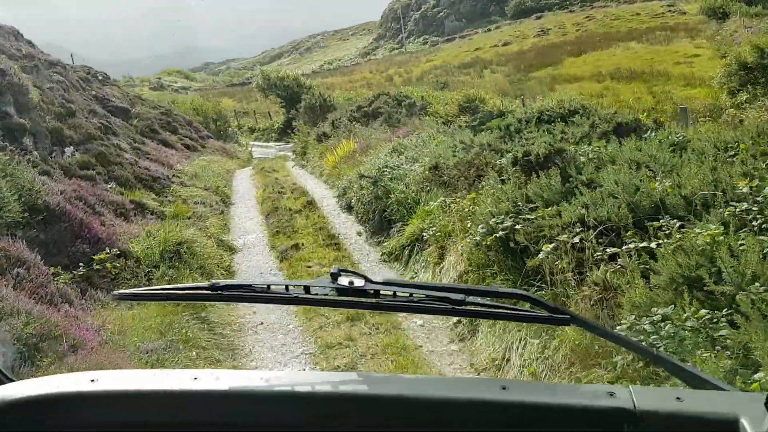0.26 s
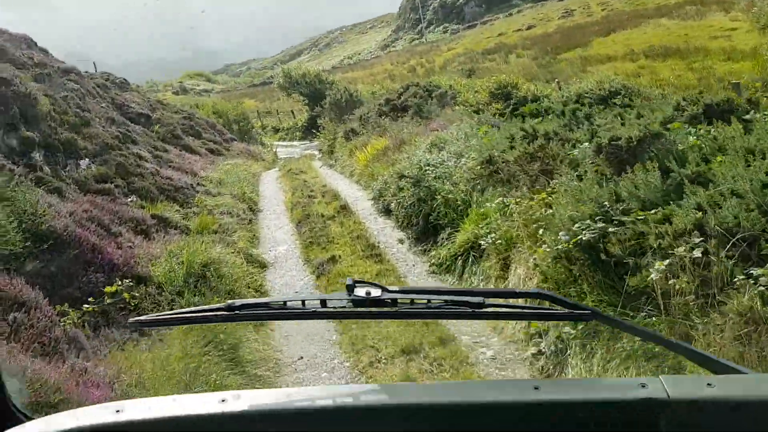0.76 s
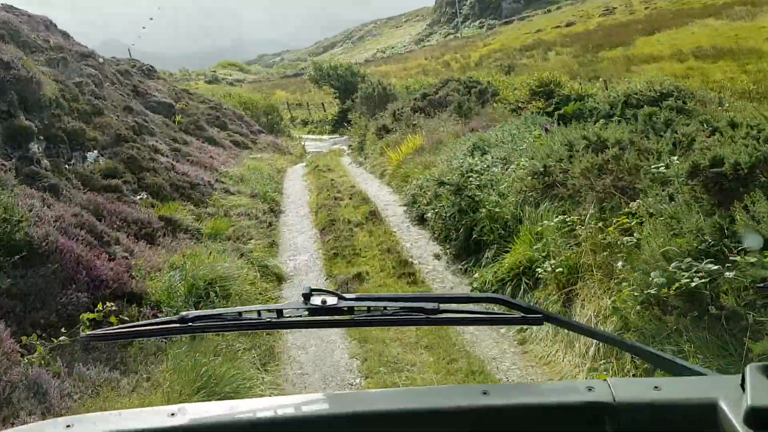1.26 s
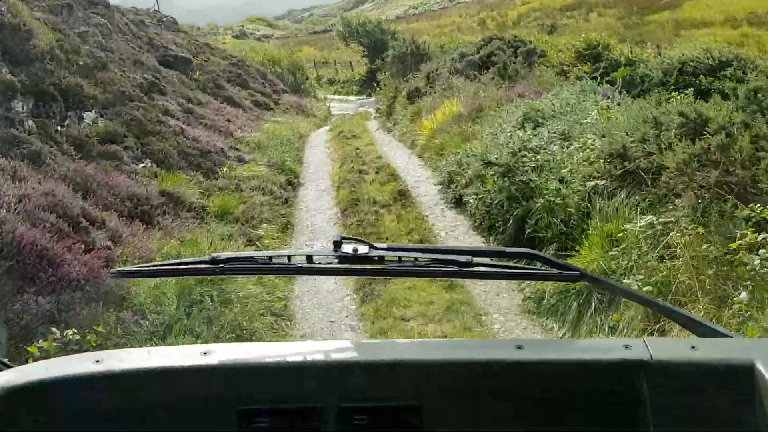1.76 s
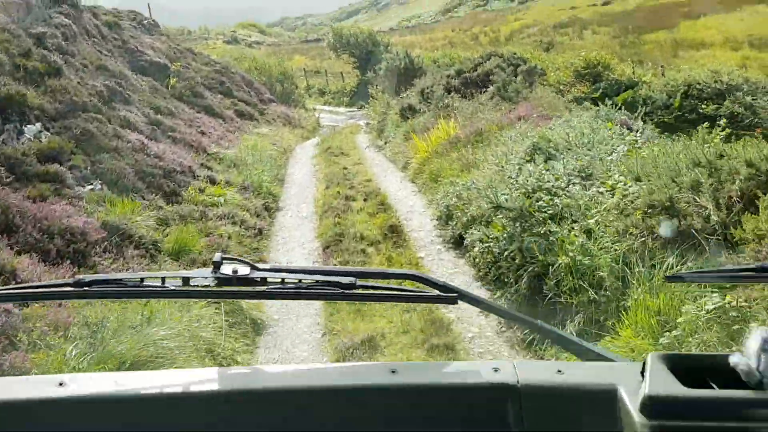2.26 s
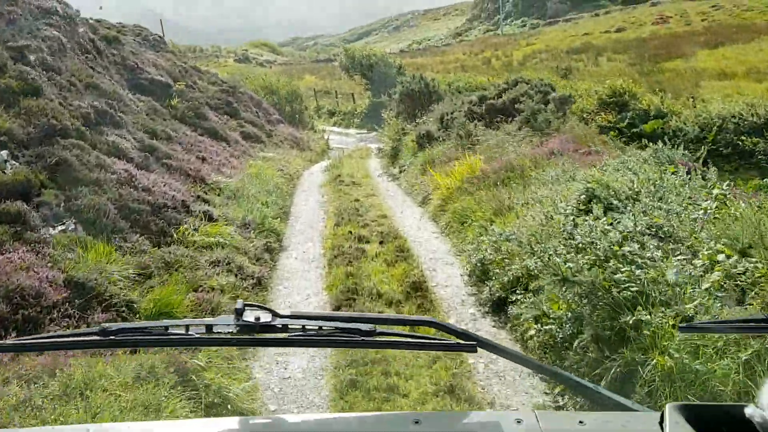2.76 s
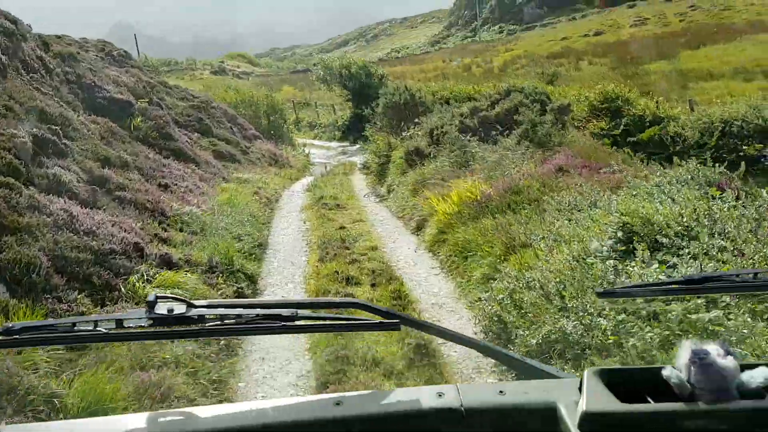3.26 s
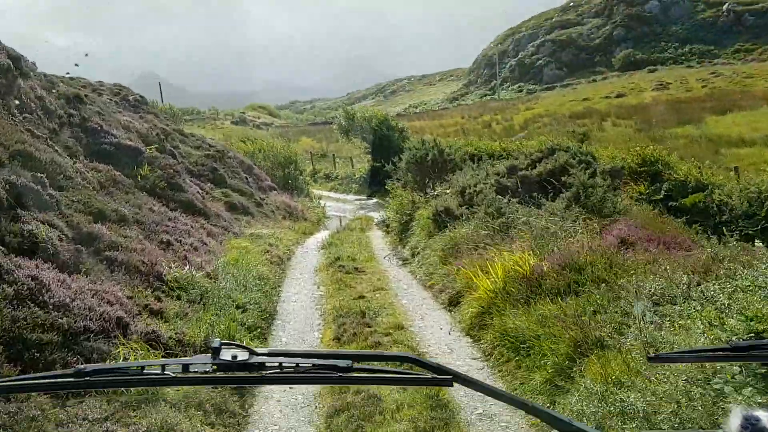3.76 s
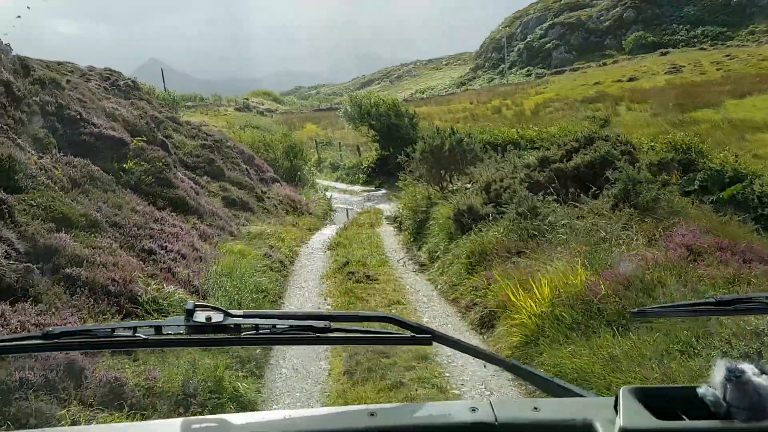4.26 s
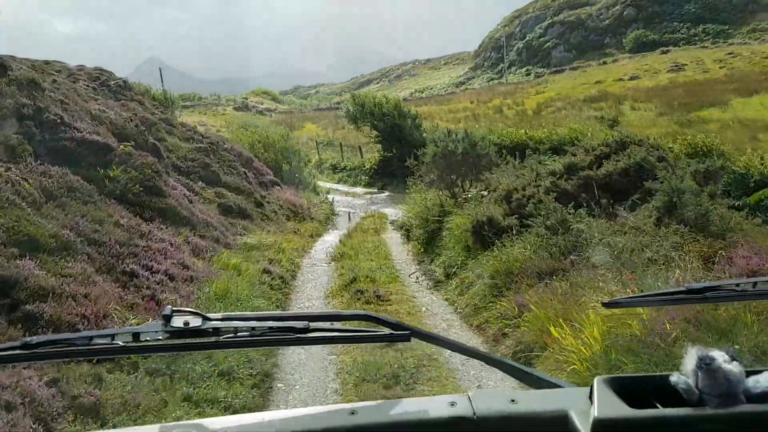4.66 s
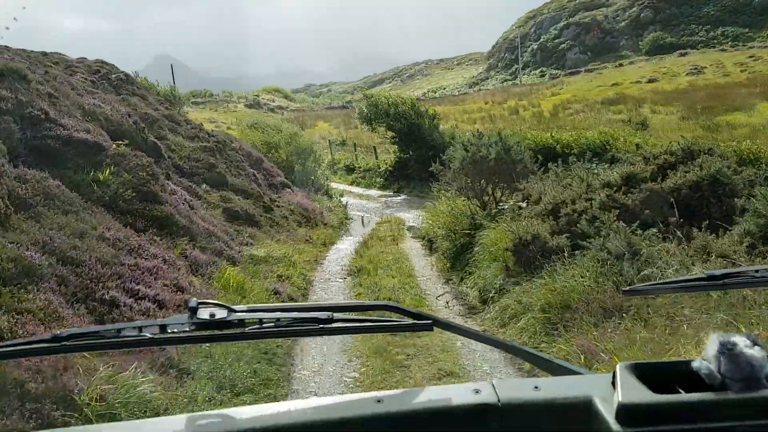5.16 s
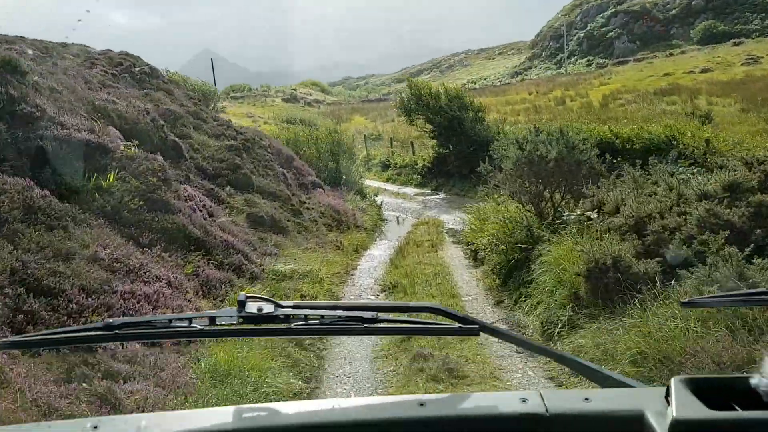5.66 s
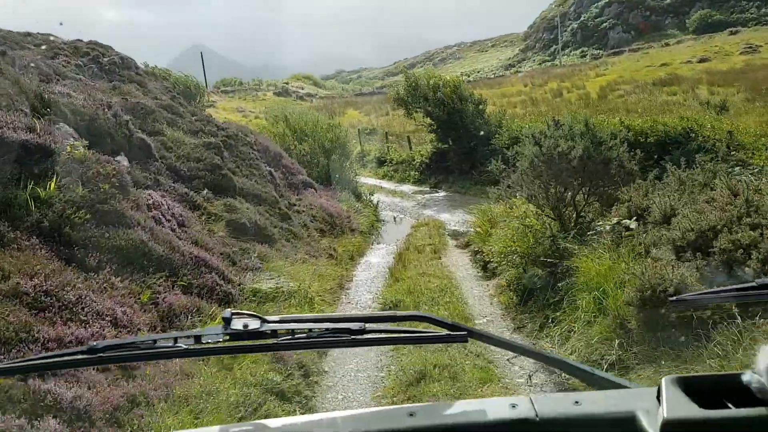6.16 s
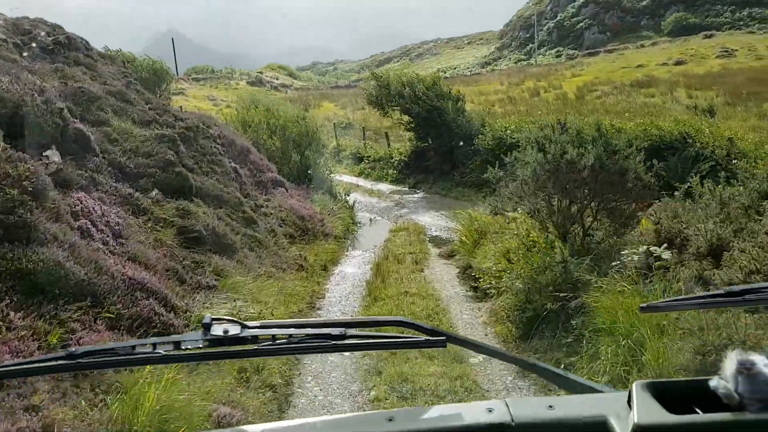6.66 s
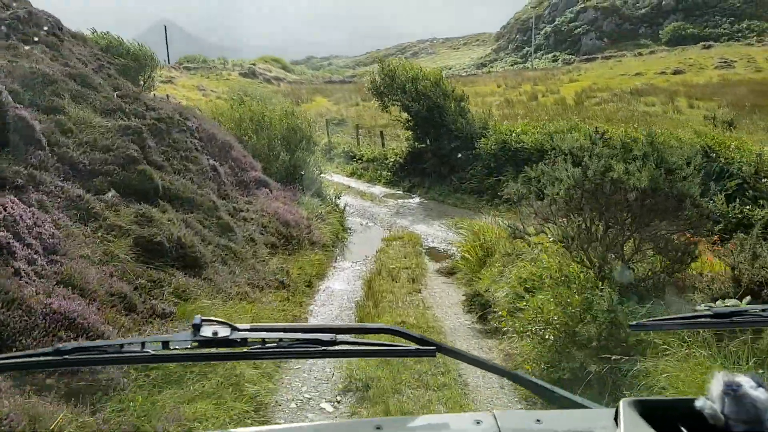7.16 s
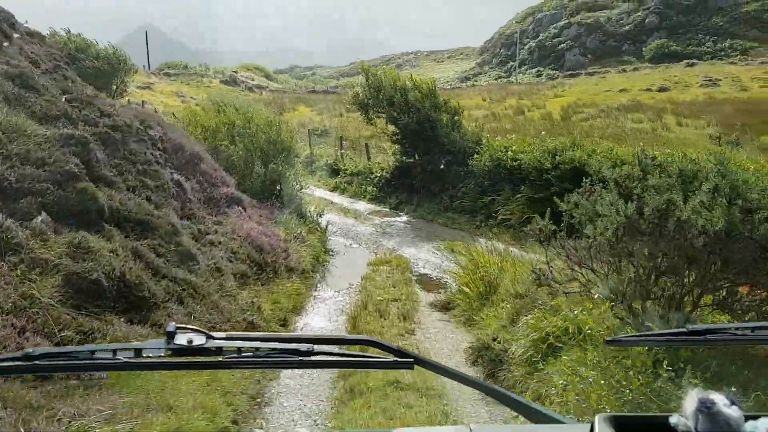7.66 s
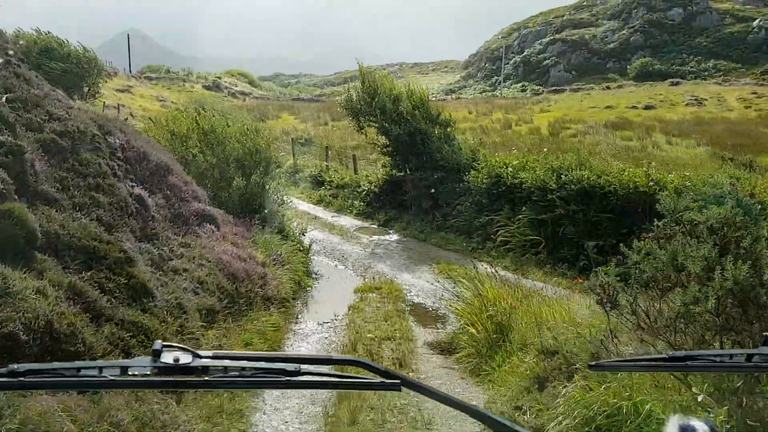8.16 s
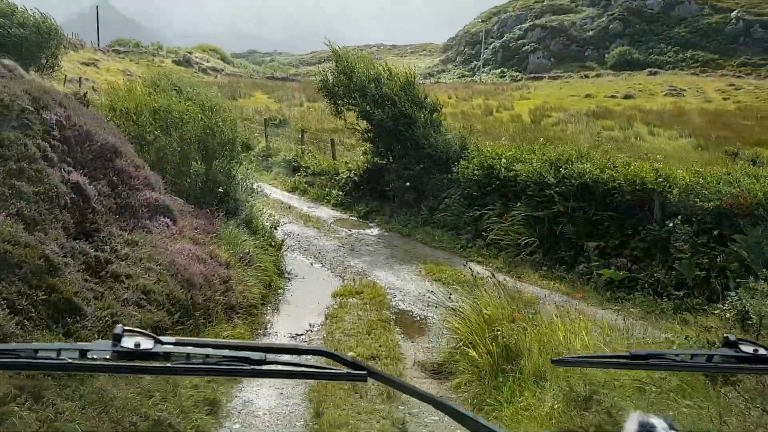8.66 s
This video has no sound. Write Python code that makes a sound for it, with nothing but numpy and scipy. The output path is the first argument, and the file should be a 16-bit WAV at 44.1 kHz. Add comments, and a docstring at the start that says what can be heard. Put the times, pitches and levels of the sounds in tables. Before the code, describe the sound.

A low diesel boom swells and sinks continually in the closed cab of a slow truck, its clatter steady over floor rumble. Two early suspension thumps and a cluster of dry plastic snaps give way to sparser rattles and short squeaks. Faint treble swishes, as if brush drags on the body, fade out after five seconds. One more knock with a sharp snap follows, then mostly engine until it eases off. Near, dry, handheld stereo perspective.

```python
"""A six-cylinder diesel booms inside the cab of a truck crawling along a bumpy track: its firing orders are tones.
Combustion rings the block and gates noise for the clatter; one loose valve ticks once per engine cycle.
The suspension knocks on ringing frame modes, trim snaps in noise bursts, and small parts squeak as short tones.
Treble swishes, hiss and road rumble are shaped noise, and a faint high whine is a blurred tone.
Two microphone ports a hand apart hear it all."""
import sys
import numpy as np
from scipy import signal
from scipy.fft import rfft, irfft, next_fast_len
from scipy.io import wavfile
from scipy.ndimage import uniform_filter1d, map_coordinates

SR = 44100
rng = np.random.default_rng(int(sys.argv[2]) if len(sys.argv) > 2 else 0)


def transcribe(u):
    """Save the signal u as a 16-bit wav file named by the first command-line argument.

    u: samples, shape (n,) or (channels, n), limited to [-1, 1]; the rate is SR.
    q: integer samples, one column per channel.
    """
    v = np.clip(np.atleast_2d(u).T, -1, 1)
    q = np.round(v * 32767).astype(np.int16)
    wavfile.write(sys.argv[1], SR, q)


N = 392043

# Engine speed. Each row: time in seconds, firings per second.
FIRING_RATE = [(0.0, 44.6), (0.15, 41.8), (0.3, 37.8), (0.8, 39.3), (1.1, 48.9), (1.4, 41.6), (1.68, 47.8),
               (1.9, 46.6), (2.5, 49.7), (2.8, 47.6), (3.3, 49.5), (3.65, 47.2), (3.95, 50.2), (4.5, 49.1),
               (4.9, 46.7), (5.2, 48.4), (6.2, 48.4), (6.8, 49.5), (7.8, 52.1), (8.1, 48.4), (8.4, 47.2),
               (8.89, 46.6)]
# The firing note swells as the engine pulls and sinks as it eases. Each row: time in seconds, mean level in dB.
FIRST_ORDER = [(0.0, -67), (0.05, -17.5), (0.17, -18.5), (0.27, -28), (0.91, -17.5), (1.09, -21),
               (1.21, -40), (1.29, -21), (1.68, -21), (1.81, -30.5), (2.01, -17.5), (2.23, -20),
               (2.35, -31.5), (2.43, -20.5), (3.27, -31.5), (3.34, -18), (3.69, -29.5), (3.74, -20.5),
               (3.89, -28), (3.99, -19.5), (4.9, -22.5), (5.07, -15.5), (5.22, -33), (5.35, -22.5),
               (6.41, -26.5), (6.78, -19), (7.6, -22), (8.12, -30), (8.17, -43.5), (8.86, -28), (8.89, -37)]
# The tone at twice the firing rate. Each row: time in seconds, mean level in dB.
SECOND_ORDER = [(0, -26), (.75, -28.5), (.95, -23), (1.12, -36.5), (1.45, -26), (2.1, -39), (2.5, -39),
                (2.9, -25.5), (3.5, -38), (4.55, -37.5), (5.1, -33.5), (6.3, -31.5), (6.9, -47),
                (7.7, -33.5), (8.89, -41)]
# Weaker, higher orders. Each row: multiple of the firing rate, mean level in dB.
UPPER_ORDERS = [(1.5, -48), (4, -56.5), (5, -46.5), (7, -46.5), (8, -51)]
# How hard road and engine work. Each row: time in seconds, rumble in dB, clatter in dB, both before a fixed trim.
LOAD = [(0, -31, -43.5), (.7, -25.5, -38), (1.7, -28.5, -40), (3.6, -29, -39.5), (5.8, -30, -39),
        (6.6, -29.5, -39), (7.9, -31, -39.5), (8.3, -33, -41), (8.89, -28, -43.5)]
# Mean strength of each cylinder in firing order, in dB.
CYLINDER_DB = [-0.5, -5.5, -2.5, -1, -10, -2]
# Tone of the clatter noise before the cab colours it. Each row: frequency in Hz, relative level in dB per Hz.
BLOCK_COLOUR = [(180, -39), (300, -8), (349, -2), (534, -13.5), (598, -7.5), (797, -15.5), (882, -8),
                (1350, -10.5), (1920, -20.5), (2760, -21.5), (6000, -48), (7800, -87), (13200, -120)]
# Block modes rung by combustion. Each row: frequency in Hz, relative level in dB, 60 dB decay time in seconds.
BLOCK_MODES = [(733, 5.5, 0.06), (894, -1.5, 0.077), (1299, 7.5, 0.082), (1510, 0, 0.13), (1723, -3.5, 0.1),
               (2174, -2, 0.066), (2530, -3, 0.1), (2783, 1, 0.063), (2920, -9.5, 0.069),
               (3270, -1.5, 0.02), (4020, -13.5, 0.044)]
# Modes of the valve tick. Each row: frequency in Hz, relative level in dB, 60 dB decay time in seconds.
VALVE_MODES = [(2150, -5, .04), (3620, 1, .022), (4600, -9, .02)]
# Suspension knocks. Each row: start in seconds, shudder level before colouring in dB, gain of the ring in dB,
# delay of the rebound in seconds, rebound level in dB.
KNOCKS = [(.028, -11.5, -19, .028, -17.5), (.866, -19.5, -24.5, 0.0279, -15),
          (5.546, -20.5, -24.5, 0.0333, -16)]
# Modes of the truck frame. Each row: frequency in Hz, relative level in dB, 60 dB decay time in seconds.
FRAME_MODES = [(76.4, -7, 0.29), (141, 2.5, 0.35), (275, 11.5, 0.065), (335, -8, 0.37), (450, -1, 0.073),
               (592, -2, 0.18), (691, -1, 0.14), (1247, -16, 0.064)]
# Trim snaps. Each row: start in seconds, burst level before band shaping in dB, dullness (lift of the low part) in dB.
SNAPS = [(0.1308, -41.5, 4), (0.1757, -47, -2), (0.2065, -46, 1), (0.363, -46, -11), (0.4864, -43, 0),
         (0.5194, -41, 2), (0.6429, -32.5, 16.5), (0.97, -34, 3), (1.003, -39.5, 3), (1.209, -37.5, -15),
         (1.6053, -44, 20.5), (2.1929, -38, 11), (2.5705, -50, 17), (3.0999, -45, 0), (3.354, -39.5, 5),
         (3.437, -41, 13), (3.471, -39.5, 0), (3.7766, -38.5, 4), (4.016, -43.5, 0.5), (5.1038, -45, 17.5),
         (5.5843, -31, -1.5), (6.55, -46, 0), (8.509, -42.5, 8)]
# Squeaks and pings. Each row: start in seconds, pitch in Hz, mean peak level in dB, length in seconds.
SQUEAKS = [(1.815, 735, -34, .045), (2.828, 1070, -33, .025), (3.842, 9350, -62, .04),
           (5.34, 730, -41, .07), (5.92, 720, -39, .06), (.65, 2030, -37, .04)]
# A faint whine: frequency in Hz, level in dB.
WHINE = (14550, -87)
# Treble swishes. Each row: start in seconds, length in seconds, level at the middle in dB.
SWISHES = [(0.197, 0.28, -64), (0.454, 0.12, -56), (0.59, 0.31, -53), (0.918, 0.18, -53.5),
           (1.146, 0.16, -60), (1.312, 0.1, -57), (1.82, 0.1, -64), (2.19, 0.23, -68), (2.46, 0.23, -61),
           (3.303, 0.36, -63), (4.61, 0.19, -62), (4.847, .15, -60.5), (5.086, 0.24, -65)]
# Tone of the swishes. Each row: frequency in Hz, relative level in dB per Hz.
SWISH_COLOUR = [(2500, -30), (4500, -5), (8300, -2), (9800, -4), (12500, -1), (16000, -2)]
# Tone of the hiss. Each row: frequency in Hz, relative level in dB per Hz.
HISS_COLOUR = [(2000, -19), (4500, -1), (6500, 0), (8100, 2), (9300, -8), (12000, -5), (16000, -6)]
# Tone of the rumble before the cab colours it. Each row: frequency in Hz, relative level in dB per Hz.
ROAD_COLOUR = [(15, -28), (30, -1.5), (45, 3), (64, -4), (98, -3.5), (159, -5.5), (208, -14), (300, -13.5),
               (352, -12), (524, -23.5), (800, -27), (1200, -52), (2000, -120)]
# Cab resonances. Each row: centre in Hz, width in Hz, lift in dB.
PANELS = [(318, 29, -3.5), (610, 37, 2.5), (739, 29, 6), (840, 53, 1.5), (2740, 40, 5.5), (3260, 37, 7.5)]
# How alike diffuse noise is at the two ports. Each row: frequency in Hz, likeness from 0 to 1.
LIKENESS = [(60, 0.99), (130, 0.69), (250, 0.88), (500, 0.99), (1400, 0.078), (4000, 0.05), (15000, 0.033)]
# Colour difference of the ports. Each row: frequency in Hz, left minus right in dB.
BALANCE = [(60, 3.5), (110, 2.5), (200, -1), (380, -0.5), (700, -3.0), (1290, -3.5), (2380, -3.5),
           (4400, -1.5), (8120, -3), (15000, 2.5)]

CYLINDERS = 6
IGNITION = .55  # part of a firing interval after which the charge lights
# Mean level or gain in dB, and dB followed per dB of the second order
THIRD_DB, THIRD_FOLLOWS = -38.5, 0.11
KNOCK_DB, KNOCK_FOLLOWS = -45.5, 0.25
# Valve tick: mean gain in dB, dB gained per dB that the pull eases, seconds over which the pull is averaged
TICK_DB, TICK_SLACK, SLACK_S = -48.5, 0.59, 0.57
REBOUND_HZ, REBOUND_S = 142.4, 0.036  # pitch and length of the soft rebound
EDGE_DB, EDGE_LOSS = -12, .6  # high part of a snap in dB, and dB it loses per dB of dullness
LAG_S = 0.00029  # the left port hears this much later
TOP_HZ = 15750  # band limit


def amp(db):
    """Gain of a level in dB."""
    return 10 ** (np.asarray(db) / 20)


def unit(x):
    """Scale to rms 1."""
    return x / np.sqrt(np.mean(x ** 2) + 1e-20)


def along(points, hz):
    """Read a table of (Hz, value) along a log frequency axis."""
    f, v = np.transpose(points)
    return np.interp(np.log(hz + 1), np.log(f + 1), v)


def curves(rows):
    """One value per sample for each column after the time."""
    s, *cols = np.transpose(rows)
    return [np.interp(np.arange(N) / SR, s, c) for c in cols]


def wobble(rate):
    """A smooth random curve with `rate` knots a second."""
    knots = rng.standard_normal(int(N * rate / SR) + 4)
    return map_coordinates(knots, [np.arange(N) * rate / SR])


def filtered(x, response):
    """Apply a complex frequency response, with both ends mirrored so that they stay smooth."""
    edge = SR // 4
    x = np.pad(x, [(0, 0)] * (x.ndim - 1) + [(edge, edge)], mode="reflect")
    m = next_fast_len(x.shape[-1])
    spectrum = rfft(x, m) * response(np.fft.rfftfreq(m, 1 / SR))
    return irfft(spectrum, m)[..., edge:edge + N]


def diffuse(pair, colour_db):
    """Colour two unrelated signals and mix them into a left and right as alike as the cab allows."""
    def response(hz):
        turn = np.arccos(np.clip(along(LIKENESS, hz), -1, 1)) / 2
        return amp(colour_db(hz)) * [np.cos(turn), np.sin(turn)]

    mid, side = filtered(pair, response)
    return np.array([mid + side, mid - side])


def panels_db(hz):
    """Lift in dB that the cab resonances give."""
    return sum(db / (1 + (2 * (hz - c) / w) ** 2) for c, w, db in PANELS)


def ring(modes, t):
    """One blow on a set of modes, each at a strength of its own; the blow takes a moment to build."""
    scatter_db, rise_s = 1.2, .0008
    tone = 0
    for hz, db, t60 in modes:
        decay = amp(db + rng.normal(0, scatter_db) - 60 * t / t60)
        tone = tone + decay * np.sin(2 * np.pi * hz * t)
    return (1 - np.exp(-t / rise_s)) * tone


def patchy(pair, depth_db):
    """Noise whose bands swell and sink in patches of their own."""
    z = signal.stft(pair, nperseg=512)[2]
    field = uniform_filter1d(rng.standard_normal(z.shape[1:]), size=3, axis=0)
    field = uniform_filter1d(field, size=12, axis=1)
    return signal.istft(z * amp(depth_db * unit(field)), nperseg=512)[1][:, :N]


def boom(firings, first_db, second_db, load_db):
    """The firing orders drum in the cab as nearly clean tones, tied to the count of firings."""
    waver_db, drift_rad = 2.5, .22  # unsteadiness of level and phase
    third_db = THIRD_DB + THIRD_FOLLOWS * (second_db - second_db.mean()) + 3.84 * wobble(7)
    levels = [first_db + 0.71 * wobble(7), second_db + waver_db * wobble(7), third_db]
    tones = np.zeros(N)
    for k, db in enumerate(levels, 1):
        tones += amp(db) * np.cos(2 * np.pi * k * firings + drift_rad * k * wobble(6))
    for k, db in UPPER_ORDERS:
        level = amp(db + load_db + waver_db * wobble(4.6))
        tones += level * np.cos(2 * np.pi * k * firings + .5 * wobble(5))
    return np.sqrt(2) * tones


def clatter(firings, level_db, knock_db):
    """Each ignition rings the block and lets a puff of noise through, each cylinder at its own strength."""
    stroke = np.floor(firings + 1 - IGNITION).astype(int)
    scatter_db = 2.1 * rng.standard_normal(stroke[-1] + 1)[stroke]
    size = amp(np.take(CYLINDER_DB, (stroke - 1) % CYLINDERS) + scatter_db)
    puffs = size * np.exp(-3 * ((firings - IGNITION) % 1))
    gate = uniform_filter1d(0.99 + 0.54 * puffs, size=80)  # smoothed so that the puffs do not click
    noise = gate * patchy(rng.standard_normal((2, N)), depth_db=1.2)
    noise = unit(diffuse(noise, lambda hz: along(BLOCK_COLOUR, hz) + panels_db(hz)))
    blows = np.diff(stroke, prepend=stroke[0]) * size
    knock = signal.fftconvolve(blows, ring(BLOCK_MODES, np.arange(SR // 10) / SR))[:N]
    return amp(level_db + 3.5 + 0.21 * wobble(6.4)) * noise + amp(knock_db) * knock


def valve(firings, pull_db):
    """One loose valve rings once per engine cycle, with the last cylinder; louder as the engine eases."""
    t = np.arange(SR // 20) / SR
    cycle = np.floor((firings + 1 - IGNITION) / CYLINDERS)
    slack_db = pull_db.mean() - uniform_filter1d(pull_db, round(SLACK_S * SR))
    tick_db = TICK_DB + TICK_SLACK * slack_db + 1.2 * wobble(6.4)
    blows = np.diff(cycle, prepend=cycle[0]) * amp(tick_db)
    return signal.fftconvolve(blows, ring(VALVE_MODES, t))[:N]


def knocks():
    """The suspension hits rubber stops: the frame rings and shudders after a soft start, then thumps back."""
    t = np.arange(SR // 2) / SR
    tones, shudder = np.zeros((2, N + SR)), np.zeros((2, N + SR))
    soft = 1 - np.exp(-t / .002)
    thump = np.sin(np.pi * np.minimum(t / REBOUND_S, 1)) * np.sin(2 * np.pi * REBOUND_HZ * t)
    for s, db, ring_db, delay, rebound_db in KNOCKS:
        hit = slice(round(s * SR), round(s * SR) + len(t))
        back = slice(round((s + delay) * SR), round((s + delay) * SR) + len(t))
        tones[:, hit] += amp(ring_db) * soft * ring(FRAME_MODES, t)
        tones[:, back] += amp(rebound_db) * thump
        shudder[:, hit] += amp(db - 60 * t / 0.2) * soft * rng.standard_normal((2, len(t)))

    def dull(hz):  # treble falls away above 1200 Hz, bass below 120 Hz
        return 14 - 40 * np.log10(1 + (hz / 1200) ** 2) - 20 * np.log10(1 + (120 / (hz + 1)) ** 2)

    return tones[:, :N] + diffuse(shudder[:, :N], dull)


def snaps():
    """Loose plastic trim snaps: short noise bursts in a low, a middle and a high part."""
    parts, t = np.zeros((3, 2, N + SR)), np.arange(SR // 4) / SR
    envelope = amp(-60 * t / 0.086) * (1 - np.exp(-t / 0.0024))
    for s, db, dull_db in SNAPS:
        burst = amp(db) * envelope * rng.standard_normal((2, len(t)))
        part_gains = amp([dull_db, 0, EDGE_DB - EDGE_LOSS * dull_db])
        start = round(s * SR)
        parts[:, :, start:start + len(t)] += part_gains[:, None, None] * burst
    bands = [(2110, 3420, 0.78), (4820, 7200, 1.4), (13000, 6000, 4)]  # centre Hz, width Hz, gain dB
    out = np.zeros((2, N))
    for part, (c, w, db) in zip(parts, bands):
        out += diffuse(part[:, :N], lambda hz: db - 3 * (2 * (hz - c) / w) ** 4)
    return out


def squeaks():
    """Parts that rub or ping give brief tones of rough level; the whine is a tone of jittering phase."""
    whine_hz, whine_db = WHINE
    phase = 2 * np.pi * whine_hz * np.arange(N) / SR + 2.5 * wobble(60)
    out = np.sqrt(2) * amp(whine_db) * np.sin(phase)
    rough = amp(2.5 * wobble(70))
    for s, hz, db, length in SQUEAKS:
        t = np.arange(round(length * SR)) / SR
        at = slice(round(s * SR), round(s * SR) + len(t))
        swell = np.sqrt(np.sin(np.pi * t / length))
        out[at] += amp(db) * rough[at] * swell * np.sin(2 * np.pi * hz * t)
    return out


def rustle(load_db):
    """Grainy treble noise swishes, perhaps brush dragging along the body, over a hiss that follows the load."""
    t = np.arange(N) / SR
    swell = sum(amp(db) * np.exp(-(2 * (t - s) / length - 1) ** 4) for s, length, db in SWISHES)
    grains = amp(1.5 * wobble(30) + 1.2 * wobble(150))
    brush = unit(diffuse(grains * rng.standard_normal((2, N)), lambda hz: along(SWISH_COLOUR, hz)))
    hiss = unit(diffuse(rng.standard_normal((2, N)), lambda hz: along(HISS_COLOUR, hz)))
    return swell * brush + amp(-63 + 0.76 * load_db + 0.59 * wobble(16.0)) * hiss


def road(level_db):
    """Tyres and axles rumble through the floor: low noise in lumps, coloured by the cab."""
    lumps = amp(0.35 * wobble(4.3) + 1.2 * wobble(14))
    noise = diffuse(lumps * rng.standard_normal((2, N)), lambda hz: along(ROAD_COLOUR, hz) + panels_db(hz))
    return amp(level_db + 0.2) * unit(noise)


def scene():
    """All sources in the cab, with the engine sounds driven by one count of firings."""
    road_db, clatter_db = curves(LOAD)
    load_db = clatter_db - np.mean(clatter_db)
    (rate,), (first_db,), (second_db,) = curves(FIRING_RATE), curves(FIRST_ORDER), curves(SECOND_ORDER)
    firings = np.cumsum(rate) / SR
    knock_db = KNOCK_DB + load_db + KNOCK_FOLLOWS * (second_db - second_db.mean())
    engine = boom(firings, first_db, second_db, load_db)
    engine = engine + clatter(firings, clatter_db, knock_db) + valve(firings, first_db)
    return engine + knocks() + snaps() + squeaks() + rustle(load_db) + road(road_db)


def record(dry):
    """The ports differ in colour and arrival time; the deepest bass is cut, and all above the band limit."""
    side = np.array([[.5], [-.5]])  # left, right

    def response(hz):
        ports = amp(side * along(BALANCE, hz)) * np.exp(-2j * np.pi * hz * LAG_S * side)
        bass_cut = 1 / (1 + (24 / (hz + 1)) ** 4)
        return ports * bass_cut * (hz < TOP_HZ)

    return filtered(dry, response)


dry = scene()
out = record(dry)
transcribe(out)
```